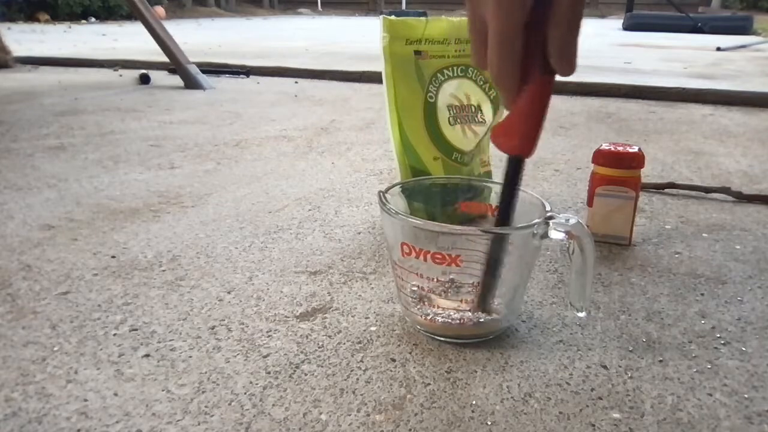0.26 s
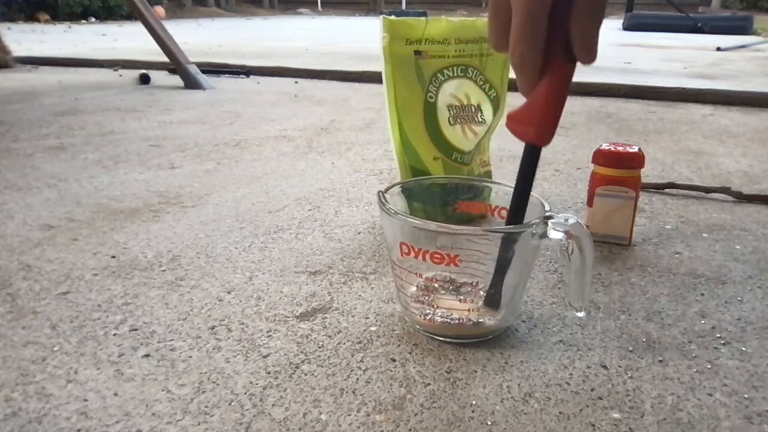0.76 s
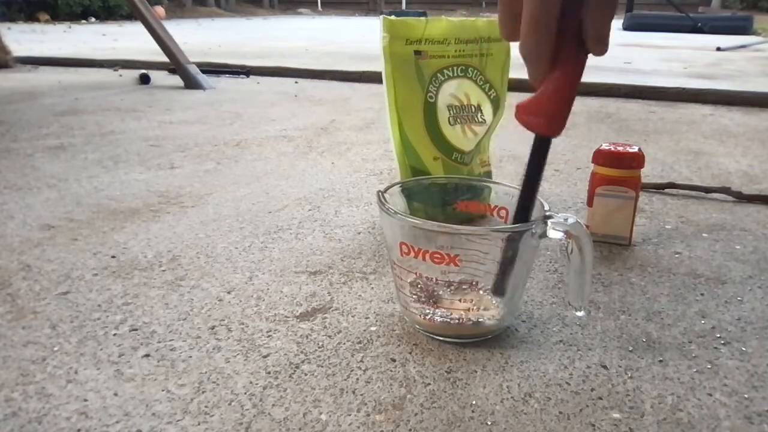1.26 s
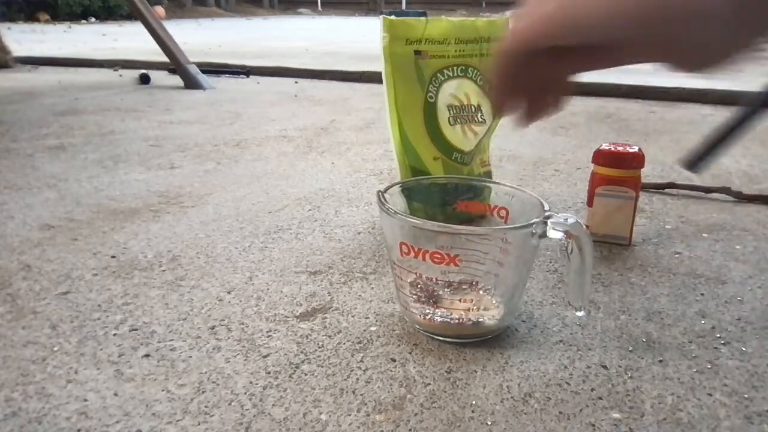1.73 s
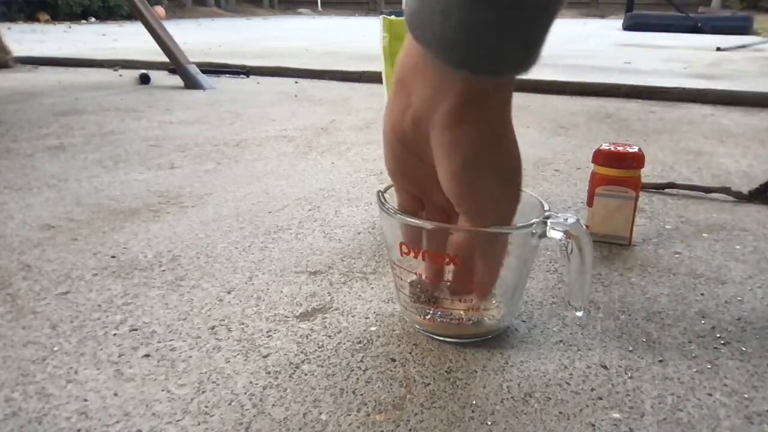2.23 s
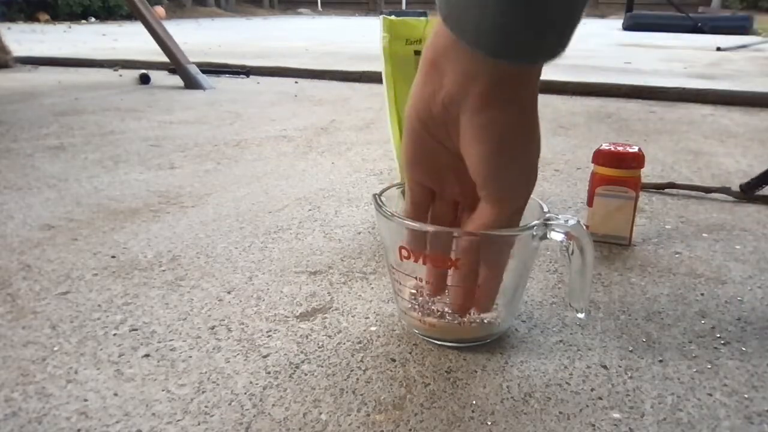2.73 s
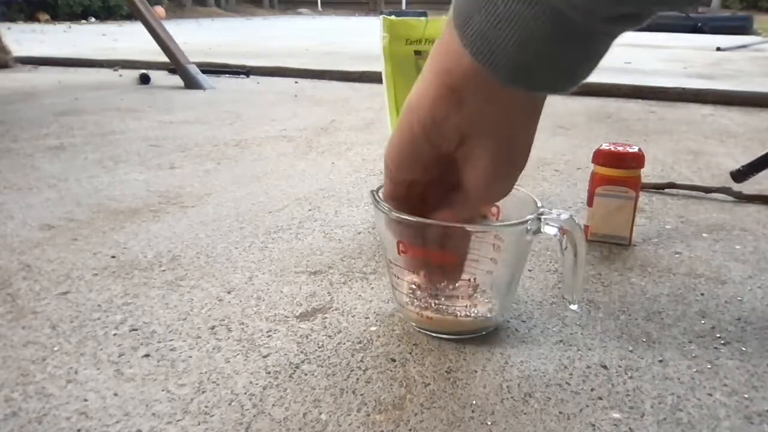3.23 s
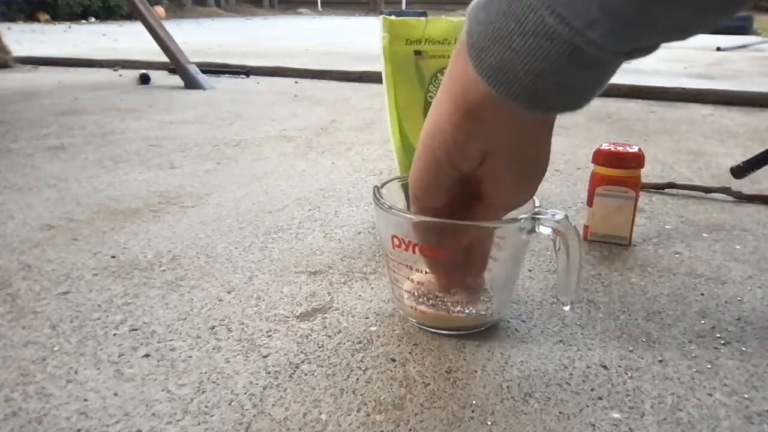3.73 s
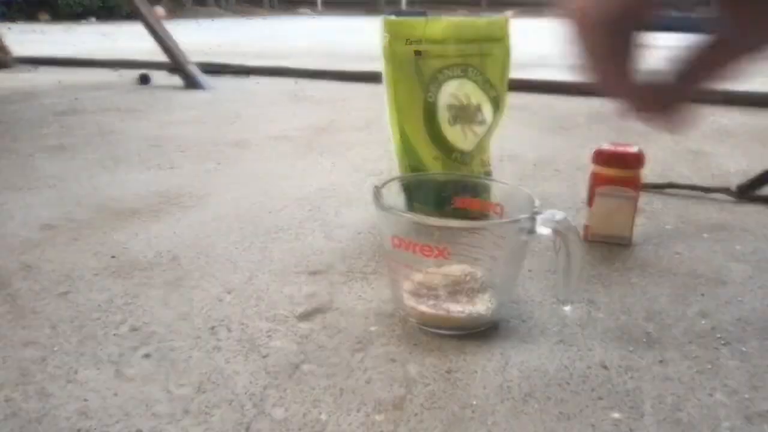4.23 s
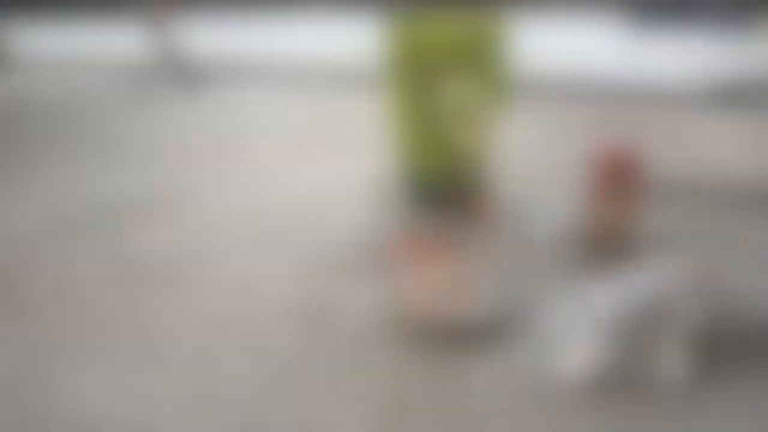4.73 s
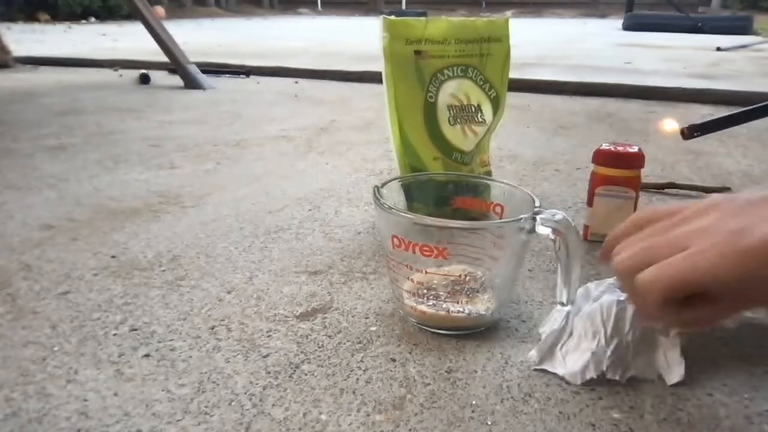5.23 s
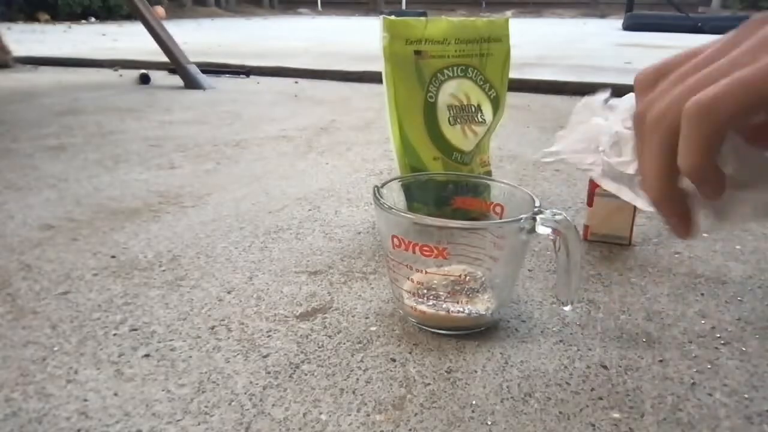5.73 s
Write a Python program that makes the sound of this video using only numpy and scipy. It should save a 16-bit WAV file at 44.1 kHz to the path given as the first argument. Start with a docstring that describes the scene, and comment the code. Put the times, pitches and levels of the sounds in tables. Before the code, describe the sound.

A dry, close perspective in an outdoor concrete yard, with short wall echoes, a thin bright tail and steady, faint distant traffic rumble. From 0 to 0.5 s a metal rod scrapes sugar and taps a glass jug, with short clinks and dull foot knocks; more taps come at 0.8-0.95 s, a sharp one at 1.24 and a weaker one at 1.3. A sleeve rustles and flaps from 1.25 to 1.7 s; a faint chirring swells near 1.9. From 2.1 to 3.6 s fingers softly rub and crunch sugar, while the jug rocks on concrete in a small rattle at 2.37 and a stronger, rapid one around 3.0. Near-quiet follows. At 4.64 s a lighter trigger creaks, then snaps at 4.70 and louder at 4.73 with a tiny high ring. A paper towel rustles and snaps from 5.2 to 5.9 s, with a small air puff at 5.74.

```python
"""A glass jug on concrete: a metal rod, then fingers, stir sugar in it; taps, crystals and knocks of the
foot excite damped modes of the glass. A lighter creaks, releases twice and rings at the second release.
A sleeve and a paper towel rustle and snap as enveloped coloured noise, with a puff of air at the microphone.
The near sources return in two wall echoes and a bright tail. Behind them lie the steady noise of distant
traffic and the swells of a faint chirring."""
import sys
import numpy as np
from scipy import signal
from scipy.fft import rfft, irfft
from scipy.io import wavfile
from scipy.ndimage import uniform_filter1d

SR = 44100
rng = np.random.default_rng(int(sys.argv[2]) if len(sys.argv) > 2 else 0)


def master_out(mix):
    """Clip the mix to full scale and print it as 16-bit PCM to the path in sys.argv[1]."""
    frames = np.transpose(np.atleast_2d(mix))
    ceiling = np.clip(frames, -1, 1)
    pcm = np.round(ceiling * 32767).astype(np.int16)
    wavfile.write(sys.argv[1], SR, pcm)


N = 263277  # samples

# Levels in the tables are relative: spectra, modes and filters act on them further.
# Modes of the glass jug: [f/Hz, level/dB, t60/s with no hand inside, extra level/dB at the rim]
GLASS_MODES = [(1441, -10, .45, 4), (2245, -12, .22, -30), (3564, -10, .2, -22), (4262, -27, .25, 20),
               (7381, -21, .1, 9), (9930, -5, .09, -4), (9560, -12, .04, -1), (11775, -21, .06, 24),
               (12835, -26, .1, 23), (13100, -18, .08, -12), (13900, -18, .07, -12), (1388, -8, .2, -30)]
# Modes of the foot on concrete: [f/Hz before the pitch factor, level/dB, t60/s]
FOOT_MODES = [(500, -11.5, 0.038), (810, 2.5, 0.036), (888, -7, 0.046), (990, -12, 0.0079)]
# Rod taps: [t/s, crack level/dB, ring level/dB, height 0 wall to 1 rim, hardness/dB per octave,
# foot knock level/dB, f/Hz of the mode favoured by the spot struck]
ROD_TAPS = [(0.16, -28.5, -44.5, 0.62, -4, -45, 1441), (0.221, -31.5, -54, 0.16, -0.5, -35.5, 3564),
            (0.2875, -47, -55, 0.22, -15, -32.5, 1441), (0.3487, -23.5, -51, 0.21, -1.5, -32, 3564),
            (0.4474, -41.5, -68, 0.48, 0.5, -65, 1441), (0.825, -45.5, -47.5, 0.056, -4, -50.5, 3564),
            (0.8319, -38.5, -73, 0.17, -8.5, -32, 1441), (0.8432, -40, -74.5, 1, 1.5, -32, 1441),
            (0.903, -34.5, -61.5, 0.21, 4.5, -43, 1441), (0.9468, -18, -42, 0.013, -2.5, -36.5, 2245),
            (1.2379, -19, -45, 0.93, 3.5, -39.5, 1441), (1.304, -33, -68, 0.4, -8, -43, 1441)]
# Pings of the rod's own tube, damped by the grip: [t/s, level/dB, f/Hz]
ROD_PINGS = [(0.16, -21.5, 1443), (0.9464, -28, 1830)]
# The jug rocking on its foot: [t/s, level/dB, extra level/dB of the lowest foot mode]
ROCKS = [(2.366, -26.5, 5.5), (2.388, -31, 12), (2.414, -37, 3), (2.428, -38, 13.5), (2.448, -41, 12),
         (2.483, -44.5, 15.5), (2.968, -46, 9), (2.99, -38, -5), (2.998, -23, 5.5), (3.006, -21, -6),
         (3.017, -17, -11), (3.029, -25.5, -7), (3.034, -32, -11), (3.045, -25, 3), (3.0565, -19, -22),
         (3.0615, -23.5, -10), (3.0665, -23, -8), (3.0765, -22.5, -1), (3.418, -48.5, 0), (3.6, -38, 4),
         (4.071, -42, 10.5)]
# Stirring strokes of the rod: [t/s, hold/s, level/dB]
ROD_STIR = [(0, 0.023, -66.5), (.15, 0.063, -62.5), (.23, 0.11, -65), (.31, 0.07, -63.5), (.79, 0.055, -71),
            (.87, 0.11, -56.5)]
# Strokes of the fingers in the sugar; the last, faint one is the sleeve as the hand withdraws:
# [t/s, hold/s, level/dB]
HAND_STROKES = [(2.12, 0.14, -79), (2.29, 0.05, -65), (2.39, 0.062, -63), (2.55, 0.13, -81),
                (2.87, 0.12, -64.5), (3.39, 0.1, -66), (3.582, 0.015, -61), (4.13, 0.12, -84.5)]
# Sugar crunching under a finger: [t/s, peak level/dB]
CRUNCHES = [(2.351, -46), (2.845, -54), (2.87, -55), (2.887, -52), (2.922, -50), (3.597, -43.5)]
# Creak of the lighter's trigger: [t/s, hold/s, level/dB]
TRIGGER_CREAK = [(4.643, 0.059, -58)]
# Trigger and spark: [t/s, peak level/dB, tilt/dB per octave, t60/s, knock level/dB]
SPARKS = [(4.6989, -13.5, -1, 0.016, -21), (4.7275, -3.5, 1, 0.015, -21.5)]
# Small parts of the igniter: [f/Hz, level/dB, t60/s]
IGNITER_MODES = [(11400, -8, .008), (15100, -7, .008)]
# Rubbing of the sleeve: [t/s, hold/s, level/dB, tilt/dB per octave]
SLEEVE_RUBS = [(1.25, 0.085, -44, 4.1), (1.35, 0.1, -40, 4.8), (1.51, 0.015, -51.5, 2.3),
               (1.56, 0.066, -38, 4.1), (1.68, 0.097, -52, 3.9), (1.8, .4, -63, 2)]
# Flapping folds of the sleeve; the first, bright one is the tick of a rod tap on the glass: [t/s, peak
# level/dB, tilt/dB per octave]
SLEEVE_FOLDS = [(1.298, -31.5, 6), (1.439, -35, 0), (1.478, -33, 2), (1.583, -39, -4.5),
                (1.603, -34.5, 2.5), (1.6223, -33, -3)]
# Rubbing of the paper towel: [t/s, hold/s, level/dB, tilt/dB per octave]
TOWEL_RUBS = [(5.215, 0.16, -58.5, -3), (5.29, 0.1, -49, -2), (5.39, 0.048, -43, -1),
              (5.462, 0.014, -43, -2), (5.505, 0.0073, -42, 2), (5.55, 0.042, -50.5, 0.5),
              (5.63, 0.057, -58.5, 1), (5.682, 0.052, -54.5, 2.5), (5.8, 0.041, -66.5, 1.5)]
# Creases snapping in the towel: [t/s, peak level/dB, tilt/dB per octave]
TOWEL_SNAPS = [(5.2289, -46, -0.5), (5.2685, -38, -1), (5.3622, -27.5, -3), (5.3957, -29.5, -0.5),
               (5.4144, -27, -3.5), (5.5503, -28, 0.5), (5.5946, -41, -4), (5.8997, -46.5, -0.5),
               (5.917, -42.5, 2)]
# Noise spectrum of rubbed sugar, also used for the trigger: [f/Hz, gain/dB]
SUGAR_SPECTRUM = [(500, -11), (1500, 3), (3000, 0), (6000, 0.5), (10000, -5), (16000, -10)]
# Noise spectrum of cloth: [f/Hz, gain/dB]
CLOTH_SPECTRUM = [(300, 15.5), (1000, 8.5), (2000, 0), (4000, -14.5), (7000, -12), (11000, -24.5),
                  (16000, -19.5)]
# Noise spectrum of the hand in the jug: [f/Hz, gain/dB]
SKIN_SPECTRUM = [(1200, -2), (2300, 0.5), (3000, -27), (5000, -5), (7000, -27), (9500, -0.5), (16000, -4.5)]
# Noise spectrum of paper, also used for the folds: [f/Hz, gain/dB]
PAPER_SPECTRUM = [(300, -4), (1000, 1.5), (2500, 1.5), (4000, -1), (7000, -7), (11000, -1.5), (16000, -12)]
# Noise spectrum of hard contacts: [f/Hz, gain/dB]
CRACK_SPECTRUM = [(500, -12), (1500, 3.5), (3000, -2), (6000, 0.5), (10000, 1.5), (16000, -9.5)]
# Faint far swells: [t/s, length/s, f/Hz, level/dB before the swell]
CHIRRS = [(0.502, 0.21, 3200, -88), (1.04, 0.19, 3630, -79.5), (1.796, 0.4, 4220, -70.5),
          (2.667, 0.32, 3800, -83.5), (3.125, 0.13, 3670, -80.5), (4.068, 0.51, 4073, -79)]
# Nearby rough walls: [delay/s, level/dB before the high-pass]
WALL_ECHOES = [(.0072, -19.5), (0.0207, -15.5)]
# Spectrum of the far traffic: [f/Hz, gain/dB]
TRAFFIC_SPECTRUM = [(12, -30.5), (20, -3), (150, -7.5), (301, -18.5), (337, -21.5), (377, -21.5),
                    (574, -20), (976, -20.5), (1760, -35.5), (2080, -42.5), (2800, -58), (4200, -53),
                    (9140, -58.5), (16000, -58.5)]
# Edges of the half-octave bands
BANDS_HZ = np.minimum(250 * 2 ** np.arange(0, 6.8, .5), 19500)

# How strokes swell and die: (attack/s, release/dB per s)
ROD_STROKE, HAND_STROKE = (0.0047, 510), (0.011, 170)
SLEEVE_STROKE, TOWEL_STROKE, TRIGGER_STROKE = (0.025, 280), (0.015, 360), (0.0038, 4500)
FAVOURED_DB = 11.5
CONTACT_T60_S = 0.0065  # build-up of a knock
PRESSED_PITCH, ROCKING_PITCH = 1.12, 0.96  # the rod presses the jug down and the foot knocks higher
HAND_DAMPING = 0.5  # share of the ring time left with a hand in the jug
PUFF_S, PUFF_PEAK_DB, PUFF_WIDTH_S = 5.7365, -26.5, 0.00062
ECHO_T60_S = 0.021
YARD_DB, YARD_T60_S, YARD_LOW_HZ = -12, 0.33, 3830  # level before the high-pass
CHIRR_WIDTH = 0.34  # bandwidth as a share of the centre frequency
TRAFFIC_DB = -52  # rms
NOTCH_HZ, NOTCH_WIDTH_HZ, NOTCH_PASS_DB = 8645, 2420, -7  # depth of each of two passes
STOP_HZ = 17157  # attenuation reaches 60 dB here


def amp(db):
    """Logarithmic level: decibels to amplitude ratio."""
    return 10 ** (np.asarray(db) / 20)


def rms_one(x):
    """Normalisation by mean power: scales to unit rms."""
    return x / np.sqrt(np.mean(x ** 2) + 1e-20)


def at_hz(points, hz):
    """Spectral interpolation: levels read linearly on a log-frequency axis."""
    points = np.array(points)
    return np.interp(np.log(hz), np.log(points[:, 0]), points[:, 1])


def clicks(times, gains):
    """Impulse excitation: single samples of the given gains at the given moments."""
    out = np.full(N, 1e-18)
    np.add.at(out, np.round(np.asarray(times) * SR).astype(int), gains)
    return out


def ring(x, hz, t60):
    """Damped oscillator: a unit impulse sets a decaying sine of initial height 1 ringing."""
    r, w = amp(-60 / (t60 * SR)), 2 * np.pi * hz / SR
    return signal.lfilter([0, np.sin(w)], [1, -2 * r * np.cos(w), r * r], x)


def coloured(x, spectrum, tilt_db):
    """Spectral shaping: weighted half-octave bands; the tilt turns about 5 kHz and may vary in time."""
    out = 0
    for low, high in zip(BANDS_HZ, BANDS_HZ[1:]):
        hz = np.sqrt(low * high)
        band_filter = signal.butter(2, [low, high], "band", fs=SR, output="sos")
        gain = amp(at_hz(spectrum, hz) + tilt_db * np.log2(hz / 5000))
        # alternating signs let neighbouring bands add
        out = signal.sosfilt(band_filter, x) * gain - out
    return out


def rub(strokes, shape, spectrum, per_s, spread_db, flutter_db):
    """Friction noise: random grains on a fluttering hiss; strokes swell, hold and die away by 40 dB."""
    out, (attack, release_db) = np.zeros(N), shape
    for s, hold, level_db, *tilt_db in strokes:
        t = np.arange(int((attack + hold + 40 / release_db) * SR)) / SR
        grain_size = amp(spread_db * np.minimum(rng.exponential(1, len(t)), 3))
        grains = (rng.random(len(t)) < per_s / SR) * grain_size
        flutter = rms_one(uniform_filter1d(rng.standard_normal(len(t)), size=400))
        # the colour keeps shifting
        turning = rms_one(uniform_filter1d(rng.standard_normal(len(t)), size=900))
        rough = rms_one((1 + grains) * rng.standard_normal(len(t))) * amp(flutter_db * flutter)
        swell = np.clip(t / attack, 0, 1) ** 2
        envelope = swell * amp(level_db - release_db * np.maximum(t - attack - hold, 0))
        stroke = coloured(rough, spectrum, sum(tilt_db) + 1.1 * turning) * envelope
        i = max(round(s * SR), 0)
        out[i:i + len(t)] += stroke[:N - i]
    return out


def burst(rows, spectrum, rise_s, lead):
    """Transient contact: a first sample, then decaying noise; rows of t/s, peak/dB, tilt, t60/s."""
    out, t = np.zeros(N), np.arange(1500) / SR
    for s, peak_db, tilt_db, t60 in rows:
        noise = rng.standard_normal(len(t)) * amp(-60 * t / t60) * (1 - np.exp(-t / rise_s))
        noise[0] = lead
        crack = coloured(noise, spectrum, tilt_db)
        crack = amp(peak_db) * crack / np.abs(crack).max()
        i = round(s * SR)
        out[i:i + len(t)] += crack[:N - i]
    return out


def jug():
    """Superposition: direct contact noise and foot knocks join the glass modes they help to excite."""
    stir = rub(ROD_STIR, ROD_STROKE, SUGAR_SPECTRUM, per_s=600, spread_db=4.0, flutter_db=3.0)
    hand = hand_in_jug()
    return stir + hand + rod_taps() + rocking() + glass(stir, hand)


def glass(stir, hand):
    """Modal resonance: taps, rocking and flung crystals excite each mode; a hand shortens its decay."""
    s, _, ring_db, rim, hard_db, _, favoured_hz = np.transpose(ROD_TAPS)
    rock_s, rock_db, _ = np.transpose(ROCKS)
    out = np.zeros(N)
    for hz, db, t60, rim_db in GLASS_MODES:
        octaves = np.log2(hz / GLASS_MODES[0][0])
        low_wall_db = db + .3 * rim_db  # knocks and crystals act low on the wall
        favoured = np.abs(np.log(favoured_hz / hz)) < np.log(11 / 10)
        struck_db = ring_db + db + rim * rim_db + hard_db * octaves + FAVOURED_DB * favoured
        struck = clicks(s, amp(struck_db))
        knocked = clicks(rock_s, amp(rock_db + low_wall_db - 23.5 - 10.0 * octaves))
        # only a few crystals flung at the wall reach each mode
        flung = rng.random(N) < 150 / SR
        crystals = flung * amp(low_wall_db - 10 + 7.6 * octaves)
        out += ring(struck + knocked + crystals * stir / 2, hz, t60)
        out += ring(crystals * hand, hz, t60 * HAND_DAMPING)
    return out


def rod_taps():
    """Impact: each tap cracks and knocks the foot; the gripped tube pings as a damped oscillator."""
    s, crack_db, _, _, hard_db, bounce_db, _ = np.transpose(ROD_TAPS)
    rows = [(a, b, c, .025) for a, b, c in zip(s, crack_db, hard_db)]
    cracks = burst(rows, CRACK_SPECTRUM, 0.00084, 0)
    pings = sum(ring(clicks([a], amp(db)), hz, 0.023) for a, db, hz in ROD_PINGS)
    return cracks + pings + bounce(s, bounce_db, 0, PRESSED_PITCH)


def hand_in_jug():
    """Friction and fracture: fingers and lastly the sleeve rub; sugar crunches in short noise bursts."""
    strokes = rub(HAND_STROKES, HAND_STROKE, SKIN_SPECTRUM, per_s=150, spread_db=5.0, flutter_db=3.0)
    return strokes + burst([(a, b, 3.0, .02) for a, b in CRUNCHES], SKIN_SPECTRUM, 0.0012, 0)


def rocking():
    """Repeated impact: the rocking foot knocks on concrete and crushes low-passed grit."""
    s, peak_db, weight_db = np.transpose(ROCKS)
    grit = burst([(a, b - 26, -9.0, .05) for a, b, _ in ROCKS], CRACK_SPECTRUM, 0.00245, 0)
    grit = signal.sosfilt(signal.butter(6, 2600, fs=SR, output="sos"), grit)
    return bounce(s, peak_db, weight_db, ROCKING_PITCH) + grit


def bounce(times, peak_db, weight_db, pitch):
    """Compliant contact: two cascaded resonances per foot mode make each knock build gradually."""
    out = 0
    mode_db = rng.normal(0, 2, (len(times), len(FOOT_MODES)))
    mode_db[:, 0] += weight_db
    for k, (hz, db, t60) in enumerate(FOOT_MODES):
        hz = hz * pitch
        contact = ring(clicks(times, amp(peak_db + db + mode_db[:, k])), hz, CONTACT_T60_S)
        # the factor offsets the gain of the cascade
        out = out + ring(contact, hz, t60) * 2 * np.log(1000) / (CONTACT_T60_S * SR)
    return signal.sosfilt(signal.butter(1, [250, 1300], "band", fs=SR, output="sos"), out)


def lighter():
    """Stored energy released: the trigger creaks, then snaps excite a knock of the hollow body."""
    s, peak_db, tilt_db, t60, knock_db = np.transpose(SPARKS)
    knock = ring(clicks(s, amp(knock_db)), 897, 0.016)
    creak = rub(TRIGGER_CREAK, TRIGGER_STROKE, SUGAR_SPECTRUM, per_s=500, spread_db=3.0, flutter_db=2.5)
    snaps = burst(zip(s, peak_db, tilt_db, t60), CRACK_SPECTRUM, .0002, 9.0)
    return creak + snaps + knock


def igniter():
    """Modal resonance: small parts ring thin and high at the last spark."""
    spark_s = SPARKS[-1][0]
    return sum(ring(clicks([spark_s], amp(db)), hz, t60) for hz, db, t60 in IGNITER_MODES)


def sleeve():
    """Friction of cloth: coloured rubbing noise, with short bursts where folds flap and one bright tick of a
    rod tap."""
    rubbing = rub(SLEEVE_RUBS, SLEEVE_STROKE, CLOTH_SPECTRUM, per_s=250, spread_db=7.0, flutter_db=2.5)
    return rubbing + burst([(a, b, c, .04) for a, b, c in SLEEVE_FOLDS], PAPER_SPECTRUM, 0.00051, 0)


def paper_towel():
    """Friction and buckling: grainy rustle, with abrupt bursts where creases snap."""
    rustle = rub(TOWEL_RUBS, TOWEL_STROKE, PAPER_SPECTRUM, per_s=150, spread_db=9.0, flutter_db=3.5)
    return rustle + burst([(a, b, c, .012) for a, b, c in TOWEL_SNAPS], PAPER_SPECTRUM, 0.0002, 0)


def air_puff():
    """Pressure pulse: air pushed at the microphone gives one negative Gaussian."""
    t = np.arange(N) / SR
    return -amp(PUFF_PEAK_DB) * np.exp(-.5 * ((t - PUFF_S) / PUFF_WIDTH_S) ** 2)


def yard(x):
    """Reflection and reverberation: convolution with two smeared wall echoes and a thin, bright tail."""
    t = np.arange(SR // 2) / SR
    tail = rng.standard_normal(len(t)) * amp(-60 * t / YARD_T60_S) * np.clip(t / 0.005, 0, 1)
    tail = amp(YARD_DB) * tail / np.sqrt(np.sum(tail ** 2))
    for delay, db in WALL_ECHOES:
        echo = rng.standard_normal(len(t)) * (t > delay) * amp(-60 * np.abs(t - delay) / ECHO_T60_S)
        tail += amp(db) * echo / np.sqrt(np.sum(echo ** 2))
    tail = signal.sosfilt(signal.butter(2, YARD_LOW_HZ, "high", fs=SR, output="sos"), tail)
    return signal.fftconvolve(x, tail)[:N]


def chirring():
    """Narrow-band noise: each faint swell is filtered noise under a smooth envelope."""
    out = np.zeros(N)
    for s, length, hz, db in CHIRRS:
        i, n = round(s * SR), round(length * SR)
        edges_hz = hz * (1 + CHIRR_WIDTH / 2 * np.array([-1, 1]))
        band_filter = signal.butter(2, edges_hz, "band", fs=SR, output="sos")
        noise = rms_one(signal.sosfilt(band_filter, rng.standard_normal(n)))
        out[i:i + n] += amp(db) * np.sqrt(np.hanning(n)) * noise
    return out


def traffic():
    """Stationary noise: a far rumble made by weighting the spectrum of white noise."""
    hz = np.maximum(np.fft.rfftfreq(N, 1 / SR), 1)
    spectrum = rfft(rng.standard_normal(N)) * amp(at_hz(TRAFFIC_SPECTRUM, hz))
    return amp(TRAFFIC_DB) * rms_one(irfft(spectrum, N))


def scene():
    """Superposition: near sources and their echoes add to the dry igniter ring and the far sounds."""
    near = jug() + lighter() + sleeve() + paper_towel() + air_puff()
    return (near + yard(near) + igniter() + chirring() + traffic())[None]


def record(dry):
    """Linear filtering: the microphone port makes a steep treble dip; a low-pass cuts the top."""
    r, w = np.exp(-np.pi * NOTCH_WIDTH_HZ / SR), 2 * np.pi * NOTCH_HZ / SR
    numerator = (1 - r * r) / 2 * np.array([1, 0, -1])
    denominator = [1, -(1 + r * r) * np.cos(w), r * r]
    for _ in range(2):
        peak = signal.lfilter(numerator, denominator, dry)
        dry = dry - (1 - amp(NOTCH_PASS_DB)) * peak
    return signal.sosfilt(signal.cheby2(12, 60, STOP_HZ, fs=SR, output="sos"), dry)


dry = scene()
out = record(dry)
master_out(out)
```